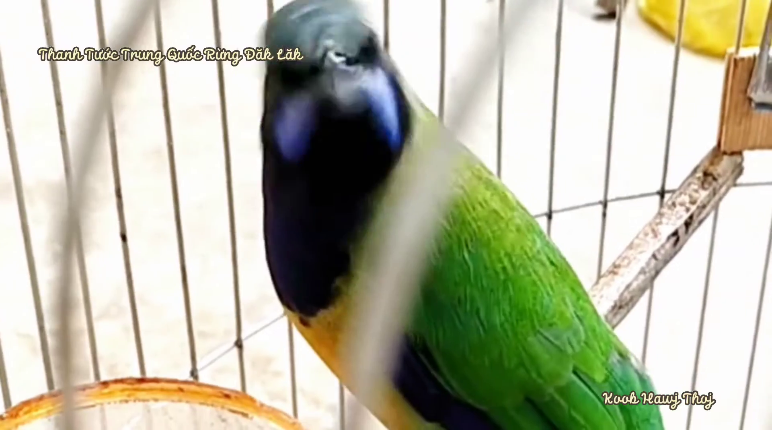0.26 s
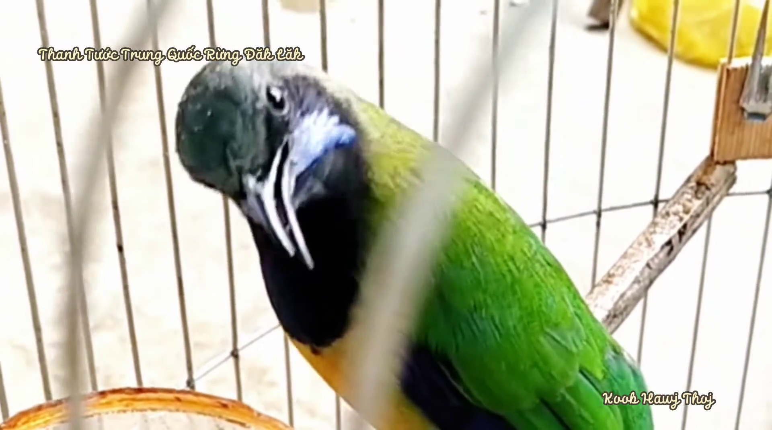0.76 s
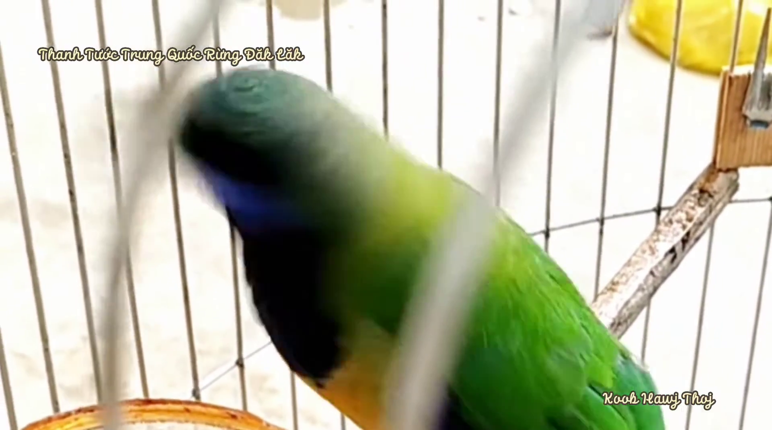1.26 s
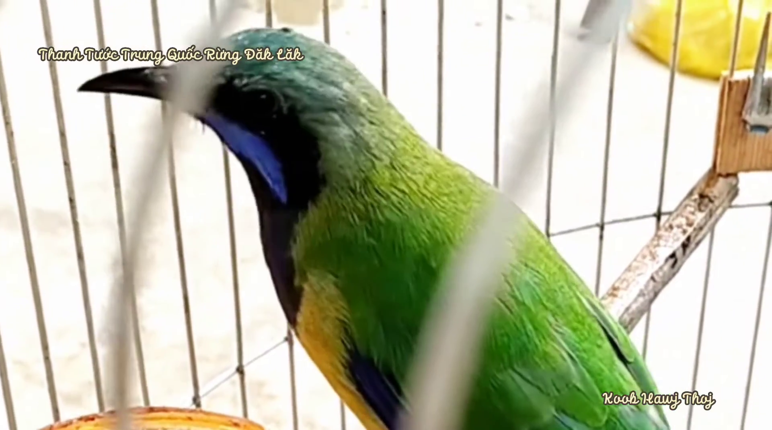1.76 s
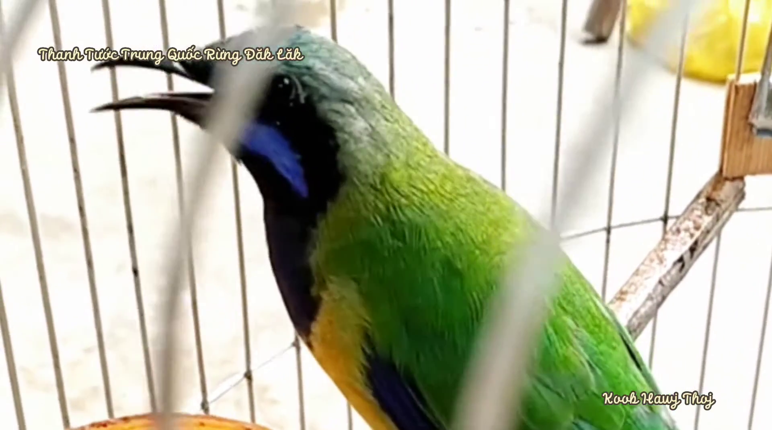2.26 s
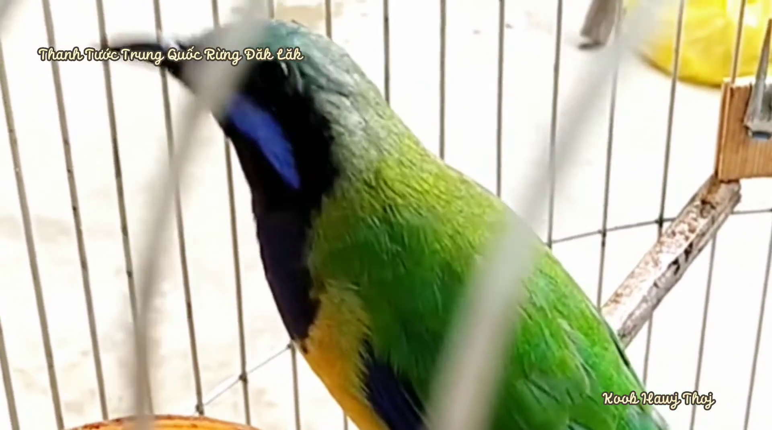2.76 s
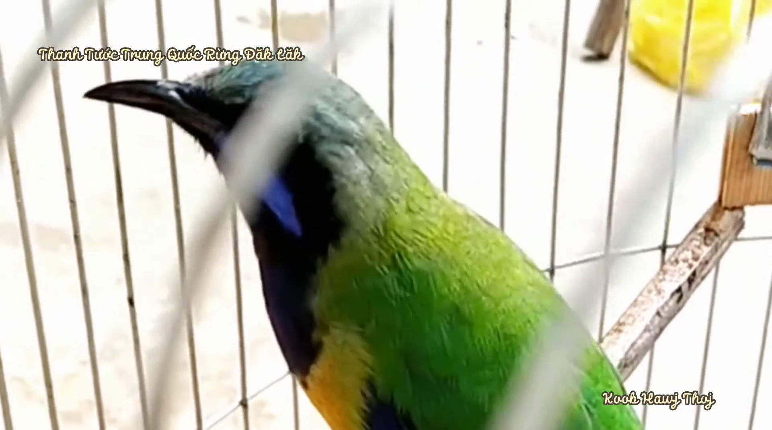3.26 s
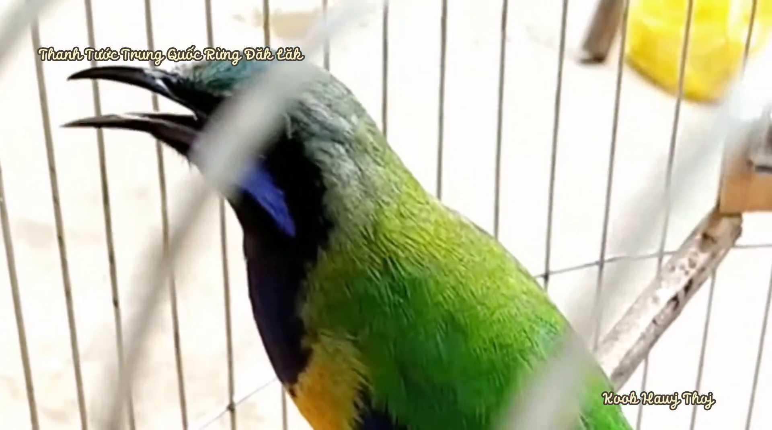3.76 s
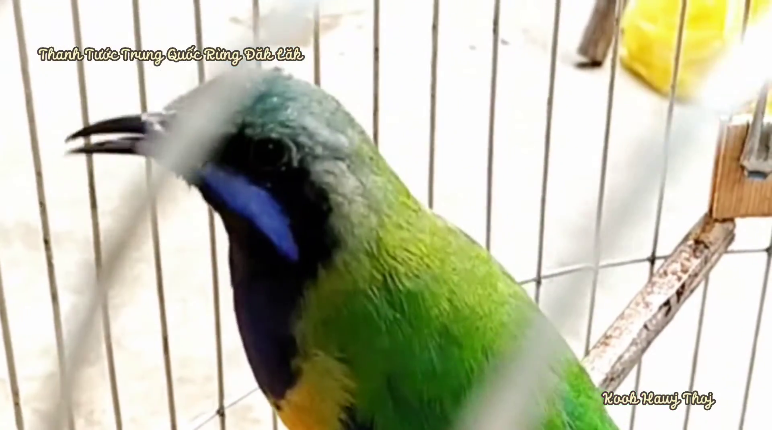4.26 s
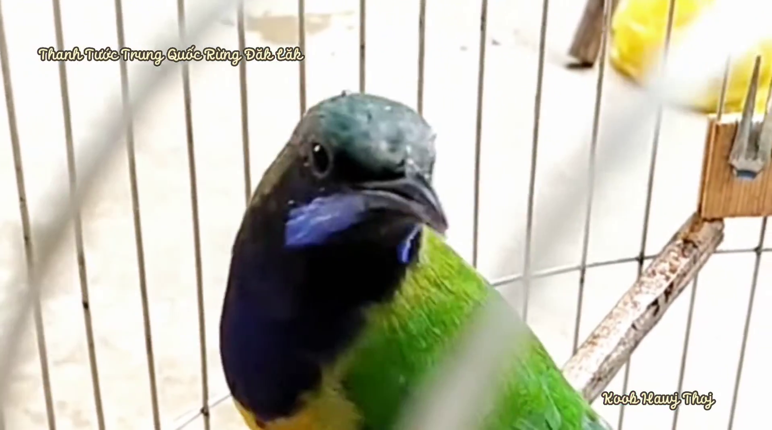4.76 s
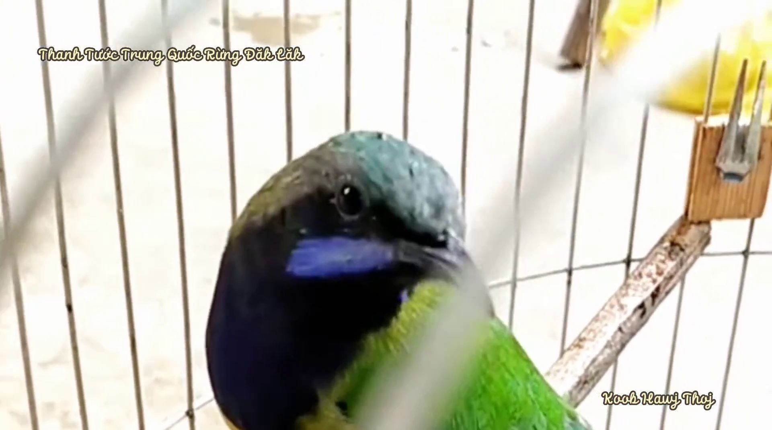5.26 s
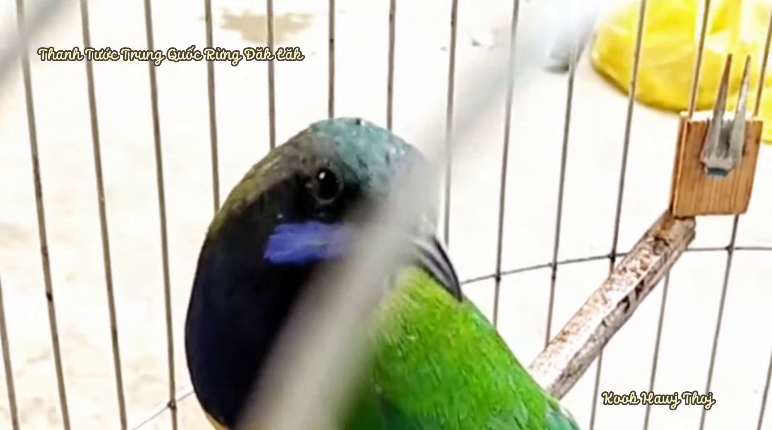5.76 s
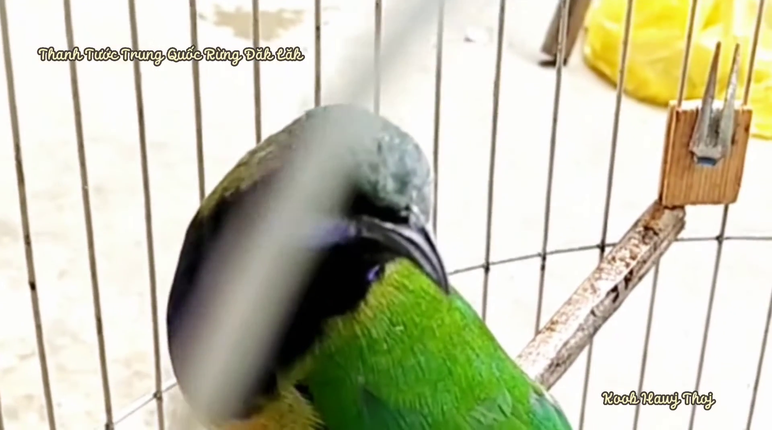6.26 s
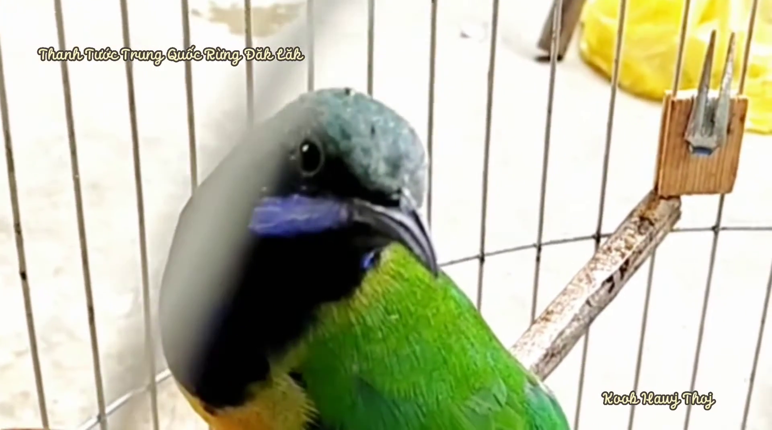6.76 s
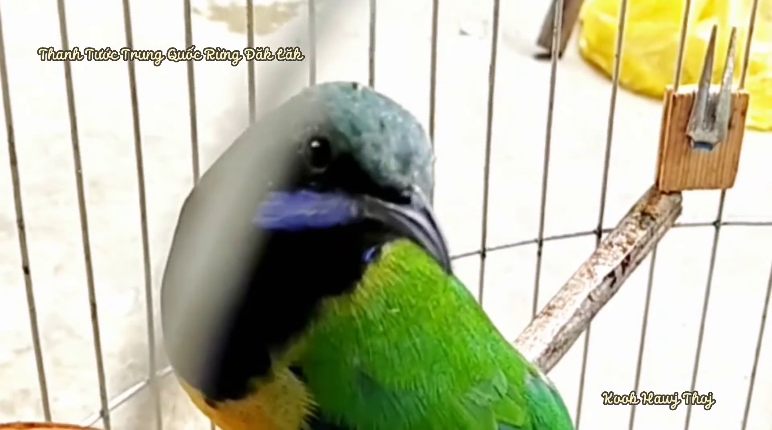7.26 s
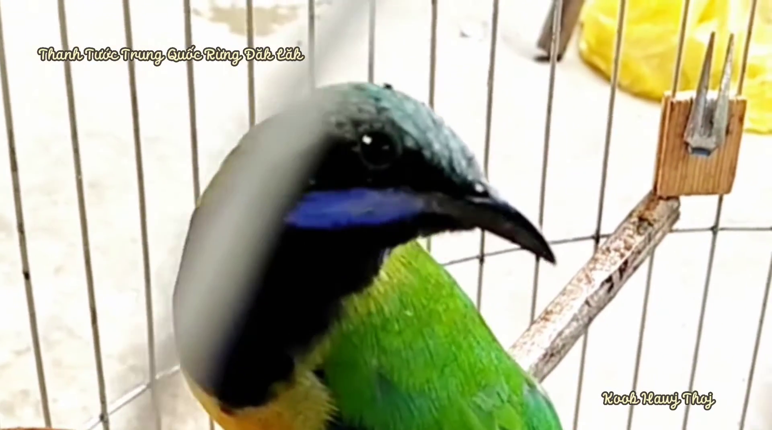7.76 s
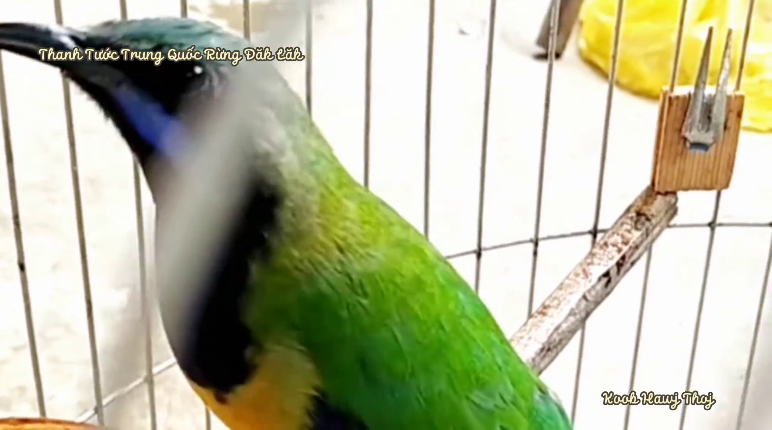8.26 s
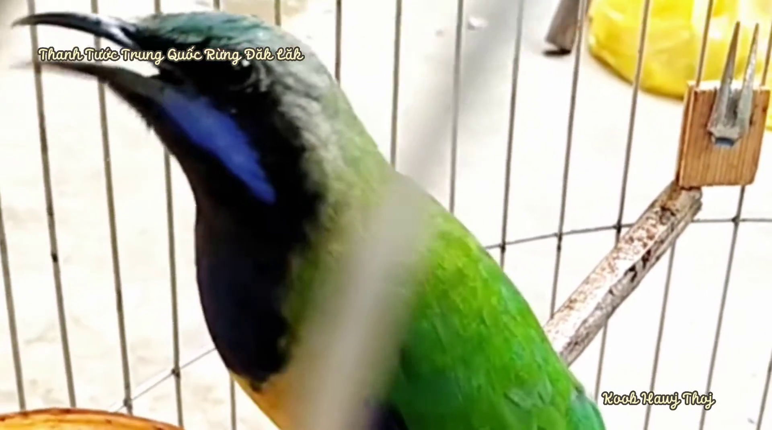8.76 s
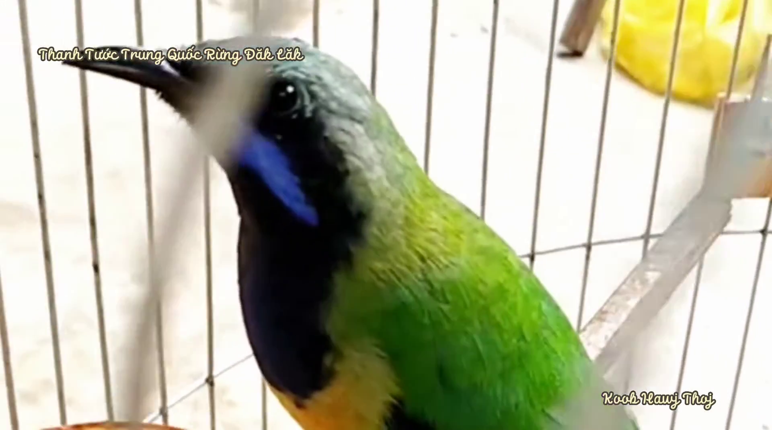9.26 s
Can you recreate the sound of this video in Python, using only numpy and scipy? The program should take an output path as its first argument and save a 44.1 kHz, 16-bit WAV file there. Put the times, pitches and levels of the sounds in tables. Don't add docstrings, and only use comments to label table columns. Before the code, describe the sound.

A small caged songbird sings very close to a cheap, overloaded microphone in a hard, reverberant room. Paired scooped whistles, short double notes and arched calls alternate with rapid chattering runs, then a pop and a burst of six steep, piercing chirps. A neighbouring bird answers faintly. Perch ticks, low air puffs, a faint engine and distant twitter sit behind.

```python
import sys
import numpy as np
from scipy import signal
from scipy.io import wavfile
from scipy.ndimage import uniform_filter1d

SR = 44100
rng = np.random.default_rng(int(sys.argv[2]) if len(sys.argv) > 2 else 0)


def unload_audio(sound):
    columns = np.transpose(np.atleast_2d(sound))
    steps = np.round(np.clip(columns, -1, 1) * 32767)
    wavfile.write(sys.argv[1], SR, steps.astype(np.int16))


def ratio(d):
    e = np.asarray(d, float) / 20
    return 10 ** e


N = 418950
TIME = np.arange(N) / SR
CUTOFF_HZ = 15600
POP_S = 7.2526


def rms_one(x):
    return x / np.sqrt(np.mean(x ** 2) + 1e-20)


def in_time(rows):
    s, *columns = np.transpose(rows)
    return [np.interp(TIME, s, column) for column in columns]


def band(x, low_hz, high_hz, order=2):
    edges = [low_hz, min(high_hz, .45 * SR)]
    return signal.sosfilt(signal.butter(order, edges, "band", fs=SR, output="sos"), x)


def highpass(x, hz):
    return signal.sosfilt(signal.butter(2, hz, "high", fs=SR, output="sos"), x)


def drift(rate):
    r = np.exp(-40 * np.pi * rate / SR)
    slow = signal.lfilter([1], [1, -2 * r, r * r], rng.standard_normal(N // 20 + 2002))[2000:]
    return np.interp(np.arange(N) / 20, np.arange(len(slow)), rms_one(slow))


# pitch_hz, level_db
THROAT = [(1500, -30.5), (3500, 6), (6000, 13), (7800, -3.5), (11000, -16), (15000, -4)]


def sing(out, rows, wobble, second_db, third_db, labial=0., hoarse=0.06, throb=0.):
    s, hz, level_db = np.transpose(rows)
    first = max(int((s[0] - .002) * SR), 0)
    last = min(int((s[-1] + 0.0017) * SR), N)
    t = TIME[first:last]
    pitch_waver, level_waver, flutter = wobble[:, first:last]
    pitch = uniform_filter1d(np.interp(t, s, hz), size=130) * (1 + 0.00469 * pitch_waver)
    edge = np.clip(np.minimum(t - t[0], t[-1] - t) / 0.0026, 0, 1)
    level = ratio(np.interp(t, s, level_db) + 1.37 * level_waver) * edge ** 2
    level *= 1 + throb * np.sin(2 * np.pi * np.cumsum(140 + 25 * level_waver) / SR)
    slack = np.clip(4.4 - pitch / 1000, 0, 3)
    phase = 2 * np.pi * np.cumsum(pitch) / SR + hoarse * (1 + slack) * flutter
    wave = np.sin(phase)
    for k, over_db in enumerate([second_db, third_db, third_db - 5, third_db - 9]):
        overtone_hz = pitch * (k + 2)
        throat_db = np.interp(overtone_hz, *np.transpose(THROAT))
        overtone_db = np.minimum(over_db + labial * slack, 3.0 - 7.2 * k) + throat_db
        wave = wave + ratio(overtone_db) * (overtone_hz < CUTOFF_HZ) * np.sin((k + 2) * phase)
    out[first:last] += level * wave


def shaped(shape, s, hz, level_db):
    return np.array(shape) * [1, hz, 1] + [s, 0, level_db]


def from_time(rows, s):
    first = [np.interp(s, rows[:, 0], column) for column in rows.T]
    return np.vstack([first, rows[rows[:, 0] > first[0]]])


# time_s, pitch_hz, level_db
WHISTLE_RISE = [(-.034, 832.7, -27), (-.022, 2412, -34), (-.016, 3042, -25), (-.011, 3350, -21.5),
                (-.005, 4534, -11.5), (0, 5162, -0.5)]


def whistle(s, held, level_db, pace, top_hz, dip_hz, end_hz):
    settled_hz = dip_hz + .6 * (end_hz - dip_hz)
    hold = [(.014, top_hz, -2), (.47 * held, dip_hz, -2.5), (.7 * held, settled_hz, 1), (held, end_hz, -10.5)]
    scoop = [(pace * t, *rest) for t, *rest in WHISTLE_RISE]
    return shaped(scoop + hold, s, 1, level_db)


# top_s, held_s, level_db, scoop_length_share
WHISTLES = [(0.371, 0.081, -6.5, 0.78), (0.541, 0.064, -3, 1.01), (2.061, 0.068, -4, 1.08),
            (2.218, 0.078, -5, 0.88), (3.526, 0.076, -4.5, 1.04), (3.695, 0.088, -6, 0.72),
            (4.613, 0.058, -2.5, 0.75), (4.756, 0.074, -4, 1), (8.462, 0.089, -6.5, 0.92),
            (8.641, 0.066, -4.5, 0.8), (8.883, 0.072, -3.5, .85)]
# top_hz, middle_hz, end_hz
WHISTLE_HZ = [(5420, 5540, 5580), (5560, 5550, 5490), (5430, 5440, 5600), (5500, 5400, 5600),
              (5650, 5400, 5580), (5550, 5430, 5520), (5600, 5520, 5460), (5330, 5420, 5750),
              (5550, 5480, 5760), (5400, 5200, 5660), (5450, 5580, 5120)]
# lower_s, upper_s
LEADS = [(.020, .021), (.018, .030), (.036, .014), (.030, .014), (.034, .014), (.028, .012), (.026, .022),
         (.013, .036), (.005, .030), (.028, .014), (.020, .018)]
WAVER = [
    [1.8],
    [1.0],
    [1],
]
# crest_s, crest_hz, level_db
HOOKS = [(0.371, 6230, -17.5), (0.541, 6026, -14.5), (2.059, 6420, -21), (2.217, 6140, -15.5),
         (3.521, 6300, -17.5), (3.692, 6130, -13.5), (4.615, 6850, -16), (4.759, 6270, -13),
         (8.461, 6114, -14.5), (8.637, 6170, -17), (8.88, 6136, -15)]
# time_s, share_of_crest_hz, level_db
HOOK_SHAPE = [(-.036, .17, -20.5), (-.028, .3, -21.5), (-.021, .52, -12), (-.014, .7, -6.5),
              (-.010, .82, 4.5), (-.003, 0.97, 6), (.004, 0.98, 0.5), (.013, .93, 6), (.04, .925, -17)]


def whistles(low, high):
    out = np.zeros(N)
    for note, melody, lead in zip(WHISTLES, WHISTLE_HZ, LEADS):
        rows = from_time(whistle(*note, *melody), note[0] - lead[0])
        sing(out, rows, WAVER * low, second_db=-32, third_db=-36, labial=19, hoarse=.06, throb=.1)
    for hook, lead in zip(HOOKS, LEADS):
        rows = from_time(shaped(HOOK_SHAPE, *hook), hook[0] - lead[1])
        rows[-2:, 1] = 5645
        sing(out, rows, 2 * high, second_db=-26, third_db=-36, labial=12, hoarse=.09)
    return out


# time_s, pitch_hz, level_db
OPENERS = [
    [(.682, 3467, -35), (.695, 4500, -32), (.703, 4897, -8), (.714, 4855, -4), (.725, 4730, -5),
     (.732, 3760, -28)],
    [(2.39, 3560, -32.5), (2.398, 4380, -26), (2.403, 4865, -6), (2.428, 4640, -11), (2.433, 3970, -14),
     (2.437, 4580, -12), (2.447, 4700, -13.5)],
    [(3.848, 3930, -30), (3.855, 4520, -12.5), (3.866, 4920, -14.5), (3.882, 5030, -1.5), (3.886, 4410, -7),
     (3.892, 3130, -30.5)],
    [(4.894, 4600, -21.5), (4.902, 4946, -4.5), (4.912, 4880, -6), (4.923, 5020, -7), (4.929, 4300, -17)],
    [(8.782, 4880, -10.5), (8.787, 5206, -6), (8.796, 4890, -1), (8.815, 5160, -11), (8.821, 4840, -2.5)],
]
# time_s, pitch_hz, level_db
CLOSERS = [
    [(.75, 3870, -13), (.761, 4105, -16.5), (.77, 5050, -2), (.781, 4810, -8.5), (.792, 5000, -2),
     (.801, 4770, -14)],
    [(2.455, 3290, -26.5), (2.466, 4220, -22.5), (2.472, 5280, -2), (2.48, 4980, -4), (2.5, 4960, -6),
     (2.516, 4900, -13)],
    [(4.947, 3705, -21), (4.96, 4210, -13), (4.971, 4900, -7), (4.99, 4975, -0.5), (5.008, 5080, -6.5),
     (5.018, 4980, -19)],
]
# time_s, pitch_hz, level_db
UPPERS = [
    [(.678, 6570, -38), (.687, 7160, -22), (.699, 7760, -33)],
    [(2.383, 5900, -24), (2.394, 7230, -25.5), (2.402, 7440, -23.5)],
    [(3.836, 6240, -38), (3.845, 7180, -20.5), (3.858, 7600, -31)],
    [(4.877, 6400, -33), (4.889, 7280, -17.5), (4.898, 7200, -20)],
    [(8.764, 5040, -15), (8.772, 6930, -23), (8.78, 7810, -46), (8.786, 7200, -13)],
    [(.747, 6100, -14.5), (.757, 7300, -21), (.765, 6460, -23)],
    [(2.452, 5090, -15.5), (2.461, 6900, -17.5), (2.47, 8050, -28), (2.481, 6060, -9)],
    [(4.947, 5900, -9.5), (4.958, 6800, -20), (4.972, 7430, -14)],
]


def short_notes(low, high):
    out = np.zeros(N)
    for upper in UPPERS:
        sing(out, upper, 2 * high, second_db=-24, third_db=-50, hoarse=.15)
    for note in OPENERS + CLOSERS:
        sing(out, note, low, second_db=-36, third_db=-38, labial=14, hoarse=.05, throb=.1)
    return out


# peak_s, peak_hz, level_db
CHEVRONS = [
    (7.277, 7430, -7.5),
    (7.332, 7670, -2),
    (7.383, 8490, 6),
    (7.449, 8180, 6),
    (7.526, 7930, 1.5),
    (7.597, 8060, -1.5),
]
# time_s, share_of_peak_hz, level_db
CHEVRON_SHAPE = [(-.011, .33, -25), (-.007, 0.52, -1.5), (-.001, 0.99, -16), (.005, 0.7, -4.5),
                 (.011, .56, -9.5), (.02, 0.3, -34)]
# start_s, pitch_hz, level_db
LEAD_INS = [
    (7.26, 1970, -28),
    (7.309, 1900, -23.5),
    (7.361, 1817, -10),
    (7.433, 1908, -11.5),
    (7.514, 1857, -17),
    (7.584, 1797, -21),
]
# time_s, share_of_pitch_hz, level_db
LEAD_SHAPE = [(-.006, 0.77, -16.5), (.002, 1.01, -11), (.010, 1.08, -4)]


def chirps(low, high):
    out = np.zeros(N)
    for chirp in CHEVRONS:
        sing(out, shaped(CHEVRON_SHAPE, *chirp), low, second_db=-18, third_db=-24, labial=5, hoarse=.13)
    for lead in LEAD_INS:
        sing(out, shaped(LEAD_SHAPE, *lead), high, second_db=2.0, third_db=-8.5, hoarse=0.077)
    return out


# time_s, pitch_hz, level_db
ARCH_UPPER = [
    [(5.486, 5020, -25), (5.493, 6020, -11), (5.505, 6790, -32.5)],
    [(5.488, 6090, -32), (5.494, 7440, -23.5), (5.499, 8240, -32.5)],
    [(4.204, 4540, -30), (4.212, 6140, -23.5), (4.221, 8370, -26)],
    [(3.08, 6340, -38), (3.086, 7350, -25), (3.09, 7780, -36)],
    [(3.076, 3870, -28), (3.081, 4270, -23), (3.085, 4550, -29.5)],
]


def arch_uppers(high):
    out = np.zeros(N)
    for upper in ARCH_UPPER:
        sing(out, upper, high, second_db=-30, third_db=-50, hoarse=.12)
    return out


# down_sweep_s, middle_hz, level_db, crest_hz
CHATTER = [(0.465, 4820, -21, 7200), (0.651, 5110, -18, 6410), (0.814, 4840, -19.5, 7400),
           (0.899, 5210, -20, 7340), (0.984, 5114, -17, 7230), (1.059, 5040, -14, 7400),
           (1.14, 4990, -16, 7840), (1.218, 4890, -14, 7270), (1.297, 5120, -15, 7430),
           (6.126, 4766, -16, 6680), (6.225, 5080, -17.5, 7500), (6.303, 4890, -20, 7260),
           (6.402, 4970, -17.5, 6200), (6.477, 4860, -13, 7180), (6.548, 4910, -16, 7360),
           (8.733, 4740, -18.5, 6850), (8.987, 4640, -24, 7340), (9.066, 4754, -15.5, 6970),
           (9.139, 4710, -15, 7030), (9.227, 4990, -17.5, 7330), (9.296, 4970, -16.5, 7140),
           (9.379, 4950, -20, 7350)]
# time_s, share_of_crest_hz, level_db
CHATTER_RISE = [(-.027, .38, -30), (-.021, .56, -15), (-.017, 0.74, -3), (-.013, 1.0, -13), (-.008, 1, -27)]
# time_s, share_of_middle_hz, level_db
CHATTER_FALL = [(-.008, 1.27, -7), (-.001, 1.04, 3.5), (.004, .89, 0.5), (.009, .74, -24)]
# time_s, pitch_hz, level_db
CHATTER_HOOK = [(1.299, 5120, -5.5), (1.304, 4750, -11), (1.319, 4930, -30)]


def chatter(low, high):
    dry_chatter = np.zeros(N)
    sing(dry_chatter, CHATTER_HOOK, low, second_db=-25, third_db=-33)
    for s, hz, level_db, crest_hz in CHATTER:
        rise = shaped(CHATTER_RISE, s, crest_hz, level_db)
        fall = shaped(CHATTER_FALL, s, hz, level_db)
        foot = shaped(LEAD_SHAPE, s - .027, 2080, level_db - 22)
        sing(dry_chatter, rise, 2.5 * high, second_db=-16, third_db=-22, labial=4.0, hoarse=.13)
        sing(dry_chatter, fall, 1.4 * low, second_db=-25, third_db=-29, hoarse=.07)
        sing(dry_chatter, foot, high, second_db=4.0, third_db=-8.0, hoarse=0.1)
    t = TIME[:1600]
    smear_s, wall_s, tray_s = .0045, .0185, .0037
    wall = ratio(-8) * np.exp(-((t - wall_s) / smear_s) ** 2 * 4)
    scatter = rng.standard_normal(1600) * (np.exp(-t / smear_s) + wall) * ratio(-24)
    scatter[0] = 1
    scatter[int(tray_s * SR)] = ratio(-1)
    scattered = np.convolve(dry_chatter, scatter / np.sqrt(np.sum(scatter ** 2)))[:N]
    return scattered, ratio(-8.5) * dry_chatter


def arch_call(rise, fall_shape, s, fall, hz, level_db):
    descent = [(share * fall, *rest) for share, *rest in fall_shape]
    return shaped(rise + descent, s, hz, level_db)


# crest_s, fall_s, crest_hz, level_db, room_send_db
ARCHES = [
    (3.101, 0.035, 4470, -4, -6.5),
    (4.228, 0.045, 4494, -2, -12),
    (5.507, 0.049, 4585, -3, -9.5),
]
# time_s, share_of_crest_hz, level_db
ARCH_RISE = [(-.024, 0.61, -34), (-.019, 0.69, -26), (-.013, .9, 1.5)]
# share_of_fall, share_of_crest_hz, level_db
ARCH_FALL = [(0, 0.99, -1.5), (0.302, 0.97, -1), (0.618, 0.82, -0.5), (.8, .5, -30), (0.998, 0.31, -24.5)]
# crest_s, fall_s, crest_hz, level_db, room_send_db
EARLY_ARCH = (7.986, 0.045, 4460, 0.0, -13)
# share_of_fall, share_of_crest_hz, level_db
EARLY_FALL = [(0, 1, -1), (.28, .92, -0.5), (.44, .67, -10), (.55, .63, -11), (.68, .43, -32),
              (1, .27, -29)]
# crest_s, fall_s, crest_hz, level_db, room_send_db
LEAPS = [
    (1.6, 0.045, 4280, -15, 0.5),
    (4.808, 0.046, 4150, -15, -3),
    (8.058, 0.047, 4245, -23, 2),
]
# time_s, share_of_crest_hz, level_db
LEAP_RISE = [(-.021, 0.55, -33.5), (-.011, .84, -12.5), (-.004, .98, -7)]
# share_of_fall, share_of_crest_hz, level_db
LEAP_FALL = [(0, 1.0, -1), (.4, .94, -1), (.62, .81, -13), (.8, .6, -25), (1, .42, -36)]
# crest_s, fall_s, crest_hz, level_db, room_send_db
NEIGHBOUR = [
    (2.597, 0.035, 4270, -23, -5),
    (5.377, 0.025, 4374, -23, -3),
    (5.422, .028, 4280, -16, -5),
    (6.861, 0.031, 4425, -11, -4),
]
# time_s, share_of_crest_hz, level_db
NEIGHBOUR_RISE = [(-.036, .7, -29.5), (-.024, .86, -19), (-.011, .97, -4)]
# share_of_fall, share_of_crest_hz, level_db
NEIGHBOUR_FALL = [(0, 0.99, 0.5), (0.3, 0.89, -5.5), (0.621, .82, -4), (.8, .66, -16.5), (1, 0.36, -30)]
# time_s, pitch_hz, level_db
OPENING_TAIL = [(.001, 4330, -6), (.009, 3330, -34), (0.018, 3900, -20.5), (0.022, 4500, -18.5)]


def arches(low):
    direct = np.zeros(N)
    sing(direct, OPENING_TAIL, low, second_db=-25, third_db=-35, hoarse=.55)
    send = ratio(-4.5) * direct
    kinds = [(-41, ARCH_RISE, ARCH_FALL, ARCHES), (-41.5, ARCH_RISE, EARLY_FALL, [EARLY_ARCH]),
             (-40, NEIGHBOUR_RISE, NEIGHBOUR_FALL, NEIGHBOUR), (-48, LEAP_RISE, LEAP_FALL, LEAPS)]
    for second_db, rise, fall_shape, calls in kinds:
        for *call, send_db in calls:
            arch = np.zeros(N)
            rows = arch_call(rise, fall_shape, *call)
            sing(arch, rows, low, second_db=second_db, third_db=-42, labial=8.0, hoarse=.05)
            direct += arch
            send += ratio(send_db + 2) * band(arch, 2500, 3700, order=1)
    return direct, send


# start_s, length_s, start_hz, end_hz, level_db
FAR_NOTES = [(1.621, 0.21, 612, 608, -54.5), (1.621, 0.099, 582, 578, -50), (1.308, 0.17, 552, 550, -54),
             (2.892, 0.16, 3215, 2870, -51), (2.915, 0.15, 6050, 6180, -53), (2.7, 0.094, 3090, 2780, -55),
             (2.975, 0.1, 3850, 3500, -54), (3.145, 0.16, 6000, 5980, -64), (3.549, 0.039, 3065, 2920, -51),
             (4.083, 0.16, 3640, 3720, -60), (6.816, .03, 3170, 3240, -42), (7.14, 0.075, 3720, 3600, -47),
             (7.195, 0.027, 2750, 2710, -53), (8.258, 0.031, 2960, 2860, -50), (8.284, 0.07, 810, 769, -49),
             (8.39, 0.059, 3680, 3700, -50), (8.402, 0.046, 3370, 3330, -41)]


def far_notes(high):
    out = np.zeros(N)
    for s, length, start_hz, end_hz, level_db in FAR_NOTES:
        rows = [(s, start_hz, level_db - 7.0), (s + length / 4, start_hz, level_db),
                (s + length, end_hz, level_db - 1.0)]
        sing(out, rows, high, second_db=-37, third_db=-45, hoarse=.06)
    return out


# middle_s, depth_db, width_s
CATCHES = [(0.711, -13, 0.0018), (0.718, -9, 0.0027), (.785, -12, 0.0037), (2.251, -18, 0.0018),
           (2.434, -15, 0.0023), (3.865, -13.5, 0.00052), (3.878, -8, 0.0022), (4.924, -13, 0.0012),
           (4.987, -26, 0.0024), (6.866, -17, 0.00083), (8.897, -3, 0.002)]


def song():
    flutter = rms_one(band(rng.standard_normal(N), 82, 834, order=4))
    low, high = (np.array([drift(188), drift(120), flutter]) for half in range(2))
    near = whistles(low, high) + arch_uppers(high) + short_notes(low, high) + chirps(low, high)
    chatter_direct, chatter_send = chatter(low, high)
    arch_direct, arch_send = arches(low)
    direct = near + chatter_direct + arch_direct + far_notes(high)
    send = ratio(-18.0) * near + chatter_send + arch_send
    direct *= ratio(sum(depth_db * np.exp(-((TIME - s) / width) ** 2) for s, depth_db, width in CATCHES))
    return ratio(6.0) * direct, ratio(0.5) * send


# delay_s, level_db, spread_s
ECHOES = [
    (0.018, -3, .005),
    (0.035, -9, 0.008),
    (0.071, -15, 0.01),
]


def room(direct, send):
    t60_s, build_s = 0.48, .013
    out = direct.copy()
    out[60:] += ratio(-30.0) * direct[:-60]
    out[205:] += ratio(-14) * direct[:-205]
    t = TIME[:SR]
    shape = ratio(-60 * t / t60_s) * np.clip(t / build_s, 0, 1) ** 2 / 3
    shape += sum(ratio(level_db) * np.exp(-((t - s) / spread) ** 2) for s, level_db, spread in ECHOES)
    tail = band(rng.standard_normal(SR) * shape, 2530, 8300)
    tail /= np.sqrt(np.sum(tail ** 2))
    stirred = send * (1 + .9 * drift(60))
    return out + signal.fftconvolve(stirred, tail)[:N]


# start_s, peak_db
TICKS = [(0.342, -2.5), (.668, -10.5), (2.152, -24), (3.49, -8.5), (3.497, -11), (3.788, -12),
         (3.799, -2.5), (3.829, -11), (5.183, -30), (7.341, 1), (7.947, -12), (7.95, -10), (7.953, -15)]


def ticks():
    clicks = np.full(N, 1e-18)
    for s, level_db in TICKS:
        clicks[int(s * SR)] = ratio(level_db + 5.0)
    return band(band(clicks, 440, 3500), 300, 4500)


def pop():
    out = np.full(N, 1e-18)
    at = int(POP_S * SR)
    out[at:at + 4] = ratio(16.0)
    out[at + 4:at + 14] = -ratio(16.0)
    return out


# middle_s, height_of_full_scale, width_s
PUFFS = [(1.348, 0.19, 0.049), (2.64, 0.19, 0.0075), (2.669, 0.2, 0.032), (2.705, 0.38, 0.023),
         (3.443, 0.11, 0.0099), (3.804, 0.21, 0.0061), (4.648, 0.2, 0.015), (5.934, 0.48, 0.052),
         (6, 0.34, 0.024), (6.5, 0.62, 0.039), (6.558, 0.72, 0.031), (6.602, 0.52, 0.021),
         (6.759, 0.47, 0.015), (6.93, 0.77, 0.031), (7.021, 0.73, 0.026), (7.138, 0.62, 0.023),
         (7.354, 1, 0.028), (7.575, 0.4, 0.0112), (7.67, 0.3, 0.02), (7.691, -0.16, 0.046),
         (7.77, -0.24, 0.018), (7.855, -0.27, 0.027), (7.922, -0.37, 0.02), (9.108, 0.25, 0.017),
         (9.203, 0.25, 0.023)]


def puffs():
    push = np.zeros(N)
    for s, height, width in PUFFS:
        push += height * np.exp(-((TIME - s) / (0.35 * width)) ** 4 / 2)
    return highpass(push, 5.0)


# time_s, level_db
RUSTLE = [(5.885, -58), (5.9, -36.5), (5.99, -46), (6.04, -52)]


def rustle():
    return ratio(in_time(RUSTLE)[0]) * rms_one(band(rng.standard_normal(N), 3200, 5630, order=3))


def crackle():
    per_s = 25
    strength = ratio(-46 + 3.5 * np.minimum(rng.exponential(1, N), 3))
    born = (rng.random(N) < per_s / SR) * strength
    gate = signal.lfilter([1], [1, -np.exp(-1 / (0.001 * SR))], born + 1e-18)
    return band(gate * rng.standard_normal(N), 12000, 22000)


# time_s, firing_hz, level_db
ENGINE = [(.01, 22.2, -43.5), (1.2, 23.07, -34.5), (2.05, 24.43, -40.5), (2.3, 24.72, -43.5),
          (2.75, 24.93, -41), (3.45, 25.67, -41.5), (4.4, 26.06, -47.5), (5.2, 26.29, -47),
          (9.4, 26.79, -46)]
# multiple_of_firing_hz, level_db
ENGINE_ORDERS = [(4, -2), (5, 2), (6, -2), (7, -1), (8, -13.5), (9, -17), (11, -16), (12, -15.5)]


def engine():
    hz, level_db = in_time(ENGINE)
    phase = 2 * np.pi * np.cumsum(hz) / SR
    orders = sum(ratio(order_db + 1.5 * drift(2.0)) * np.sin(k * phase) for k, order_db in ENGINE_ORDERS)
    return ratio(level_db) * orders


def coloured(spectrum, patchy_db, rate):
    hz, level = np.transpose(spectrum)
    edges = hz[0] * 2 ** np.arange(0, np.log2(hz[-1] / hz[0]) + .3, 1 / 3)
    white, together, out = rng.standard_normal((2, N)), drift(11.0), 0
    for k, (low, high) in enumerate(zip(edges, edges[1:])):
        centre_db = np.interp(np.log(low * high) / 2, np.log(hz), level)
        flicker_db = patchy_db * (low < 7000) * (0.31 * together + drift(rate))
        out = out + ratio(centre_db + flicker_db) * band(white[k % 2], low, high)
    return rms_one(out)


# time_s, rumble_db, twitter_db
BACKDROP = [(0.0, -37, -33.5), (7.59, -37, -36), (9.5, -38, -29.5)]
# pitch_hz, level_db per Hz
TRAFFIC = [(15, -0.5), (25, -3.5), (133, -11), (403, -28), (1130, -27.5), (2270, -37), (2600, -42),
           (3380, -40), (5720, -120)]
# pitch_hz, level_db per Hz
TWITTER = [(1290, -27), (2200, -10.5), (3280, 3.5), (4410, -1.5), (5060, 26.5), (6470, -33.5), (8060, -51),
           (9420, -15), (14600, -18.5), (15500, -34)]


def backdrop():
    rumble_db, twitter_db = in_time(BACKDROP)
    rumble = ratio(rumble_db + 1.5) * coloured(TRAFFIC, patchy_db=4.5, rate=8.9)
    return rumble + ratio(twitter_db - 8.5) * coloured(TWITTER, patchy_db=3.5, rate=16)


def scene():
    bird = room(*song())
    handling = ticks() + pop() + puffs()
    return (bird + handling + rustle() + crackle() + engine() + backdrop())[None]


def gain_control(x):
    release_db_per_s, linger_s = 61.7, 0.08
    over_db = np.maximum(20 * np.log10(np.abs(band(x, 300, 5370, order=1)) + 1e-6) + 6.56, 0)
    held_db = np.maximum.accumulate(over_db + release_db_per_s * TIME) - release_db_per_s * TIME
    keep = np.exp(-1 / (linger_s * SR))
    linger_db = 0.054 * signal.lfilter([1 - keep], [1, -keep], held_db)
    x = x * ratio(-.62 * uniform_filter1d(held_db, size=120) - linger_db)
    return x * ratio(-6 * ((TIME > POP_S + .001) & (TIME < 7.341)))


def capsule(x):
    swing = np.minimum(np.abs(band(x, 250, 8000, order=1)), 1)
    swing = signal.sosfilt(signal.butter(2, 30.0, fs=SR, output="sos"), swing)
    sag = highpass(swing, 1.8)
    rebound = .32 * (np.exp(-TIME / .075) - np.exp(-TIME / .006))
    rebound -= .2 * np.exp(-np.abs(TIME - POP_S) / .02) * (TIME > POP_S)
    return x - .75 * sag + rebound


def roll_off(x):
    return signal.sosfilt(signal.butter(12, 16130, fs=SR, output="sos"), x)


def record(dry):
    x = capsule(gain_control(dry[0]))
    knee = 12
    x = 1.04 * x / (1 + np.abs(x) ** knee) ** (1 / knee)
    x = signal.sosfilt(signal.cheby2(12, 60, CUTOFF_HZ * 1.03, fs=SR, output="sos"), x)
    return roll_off(np.clip(x, -1, 1)[None])


dry = scene()
out = record(dry)
unload_audio(out)
```